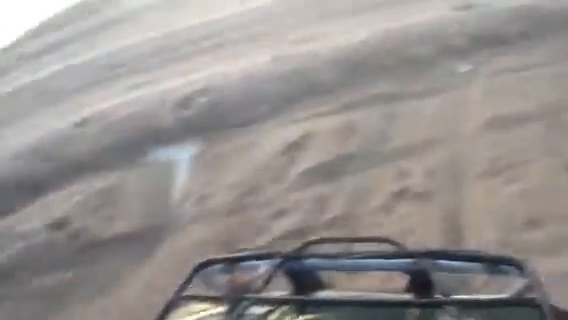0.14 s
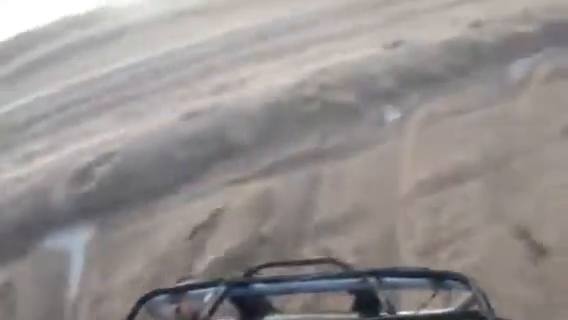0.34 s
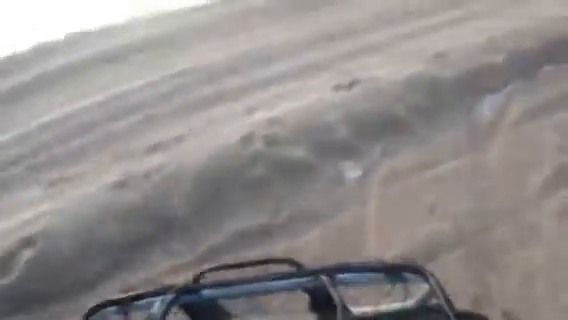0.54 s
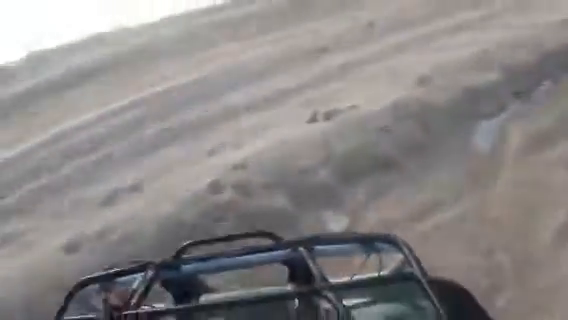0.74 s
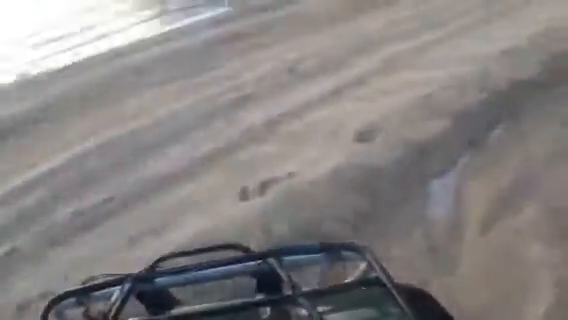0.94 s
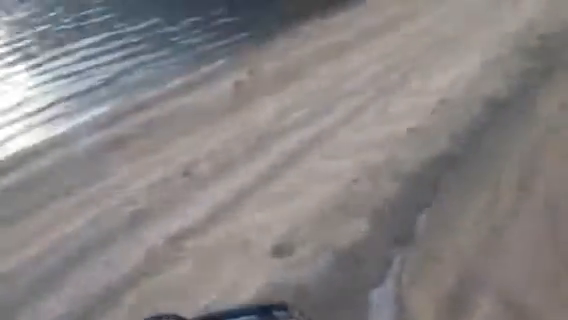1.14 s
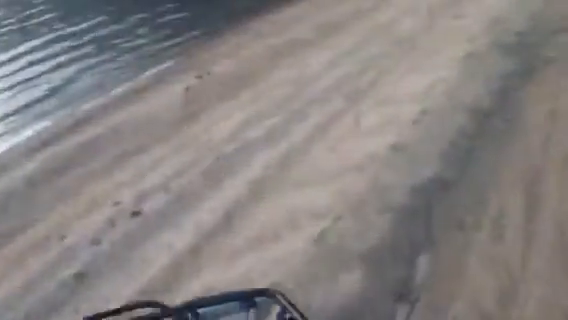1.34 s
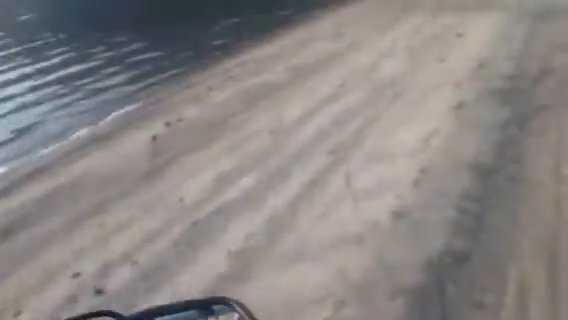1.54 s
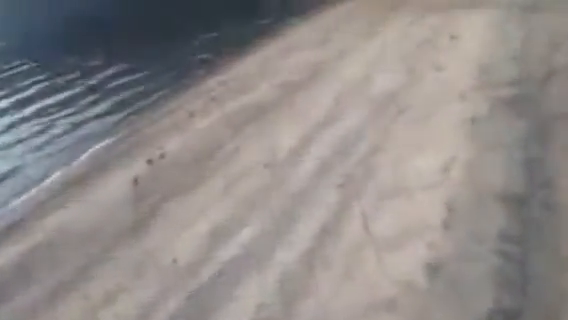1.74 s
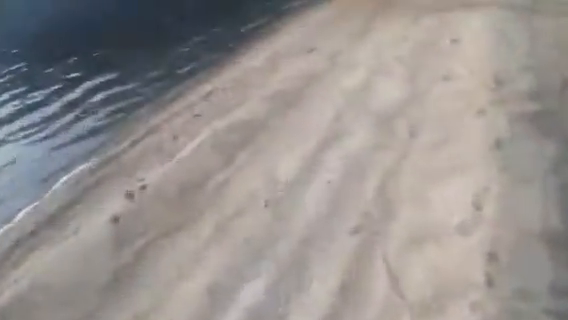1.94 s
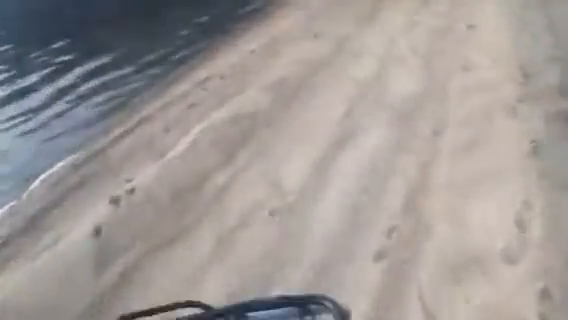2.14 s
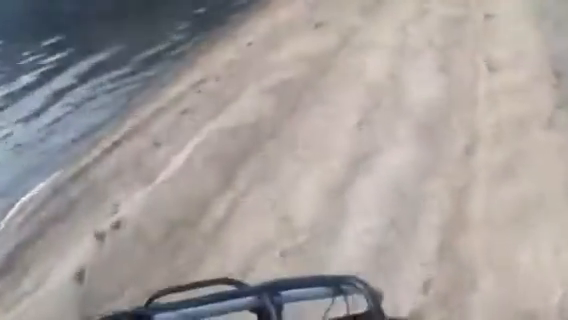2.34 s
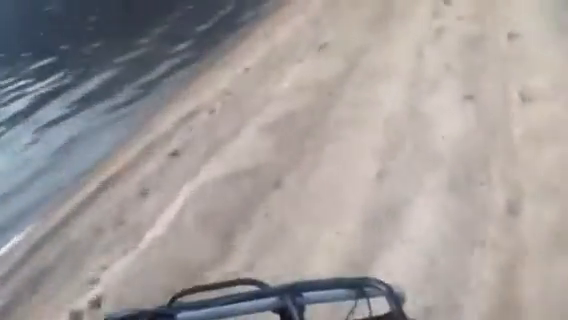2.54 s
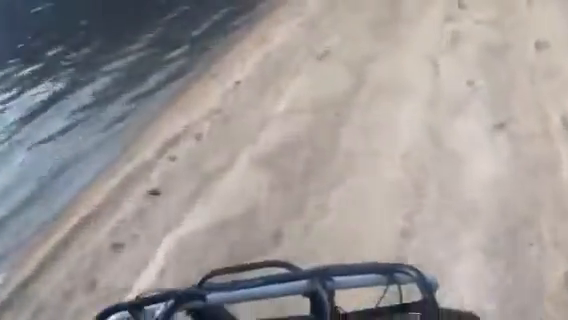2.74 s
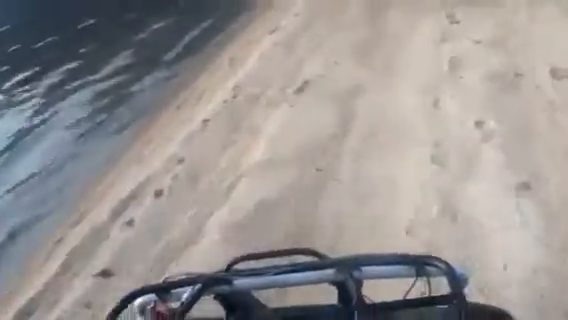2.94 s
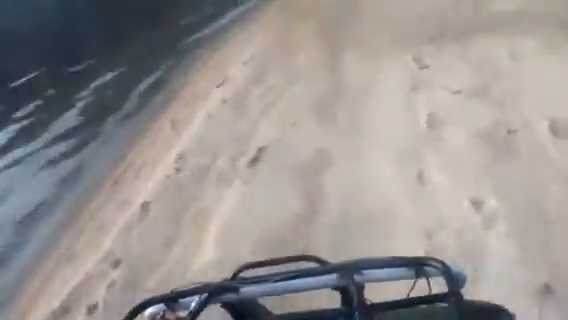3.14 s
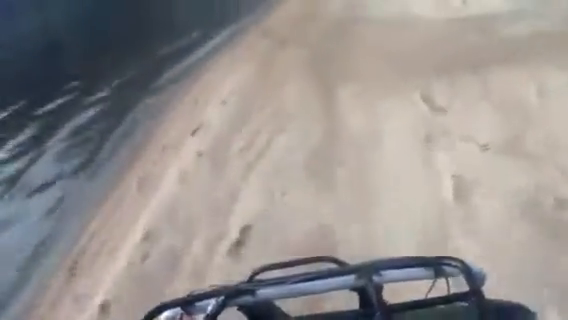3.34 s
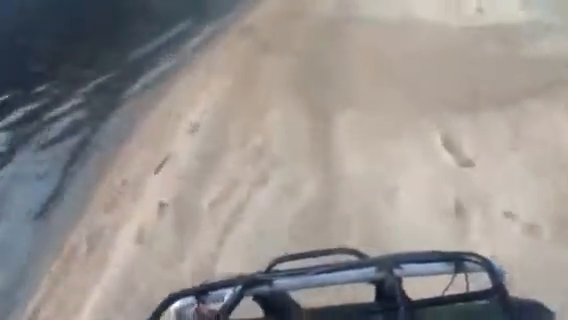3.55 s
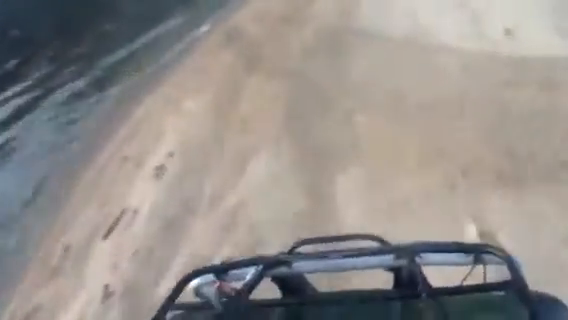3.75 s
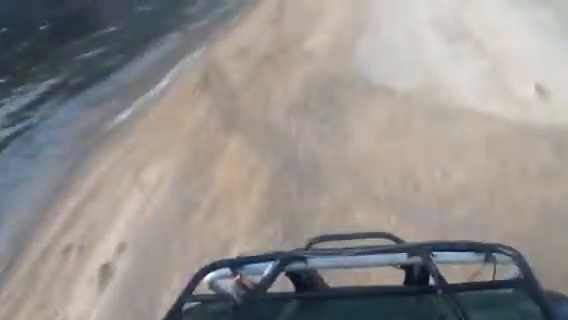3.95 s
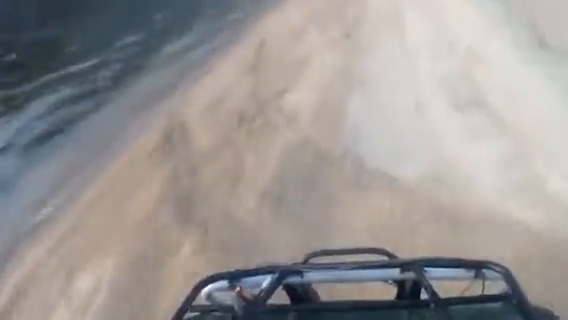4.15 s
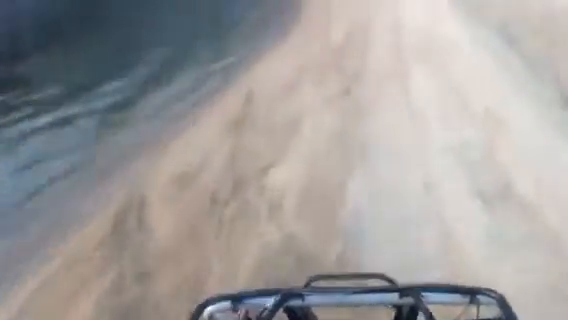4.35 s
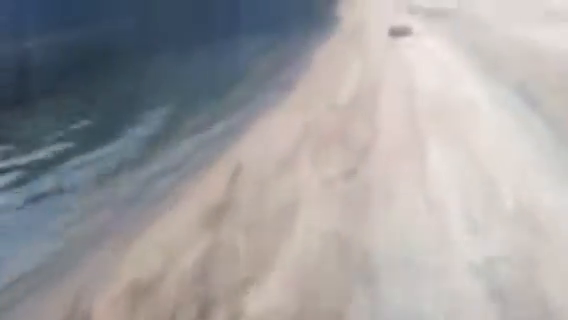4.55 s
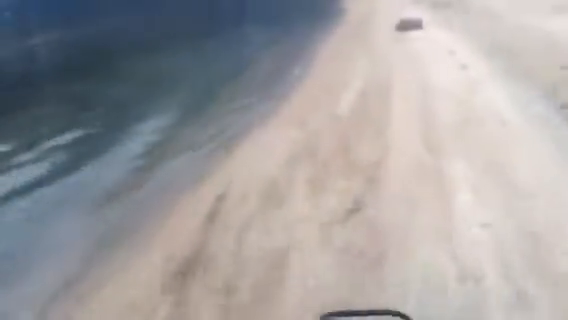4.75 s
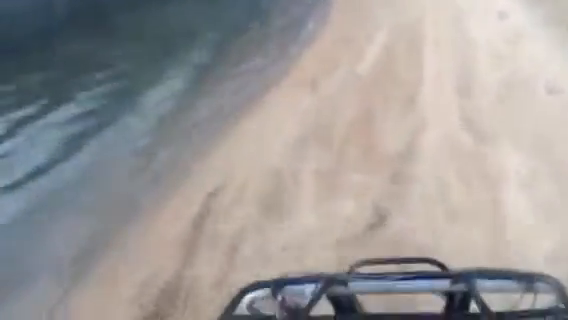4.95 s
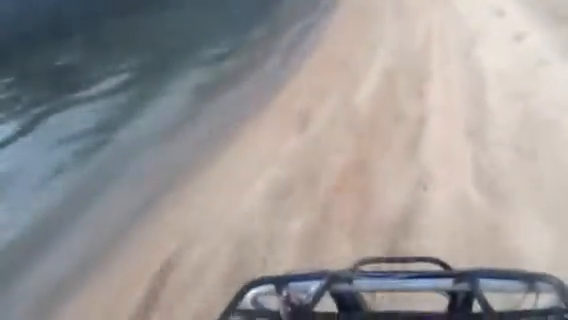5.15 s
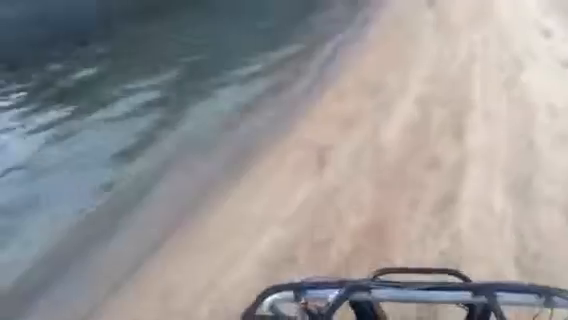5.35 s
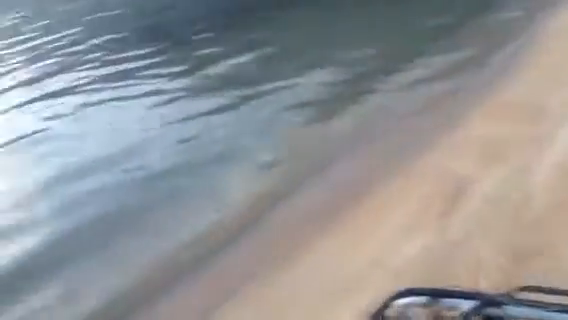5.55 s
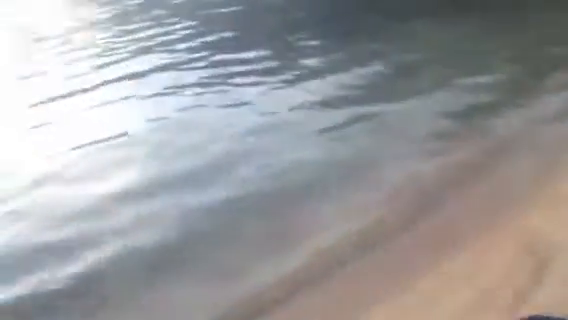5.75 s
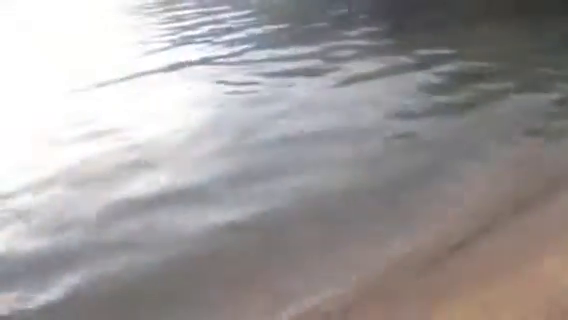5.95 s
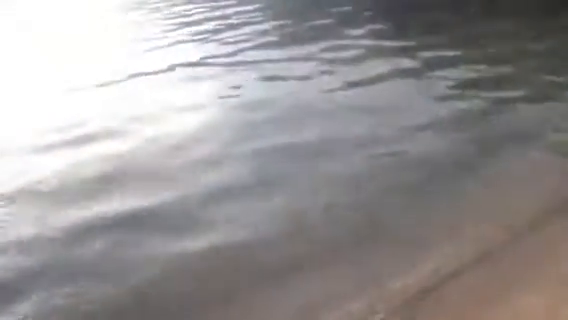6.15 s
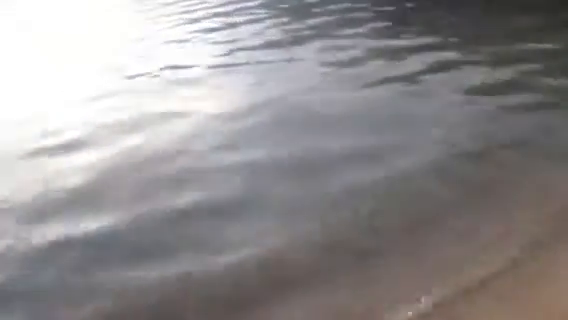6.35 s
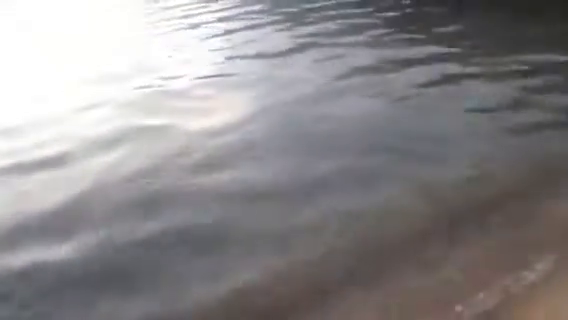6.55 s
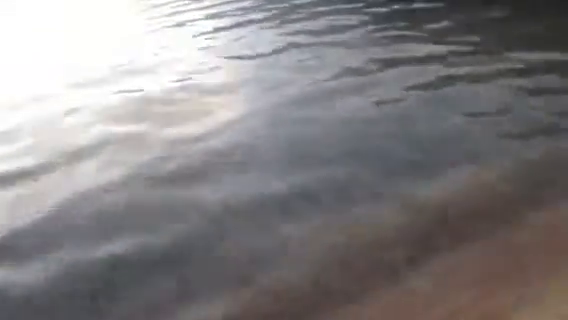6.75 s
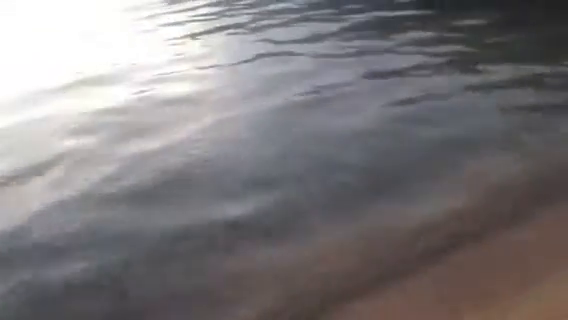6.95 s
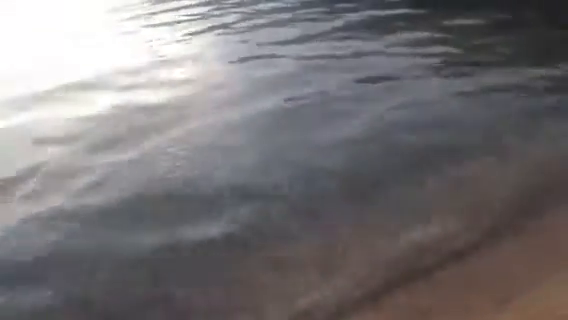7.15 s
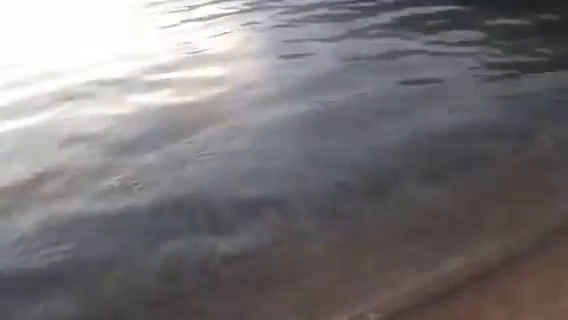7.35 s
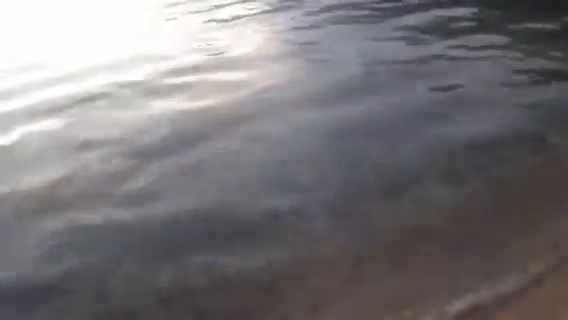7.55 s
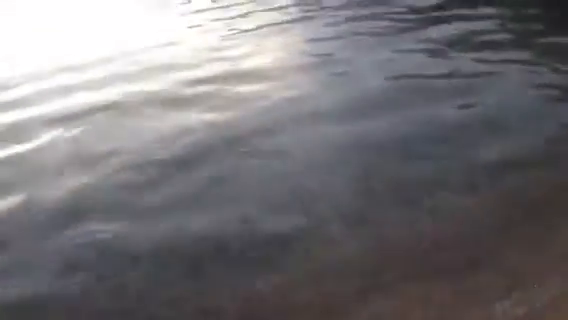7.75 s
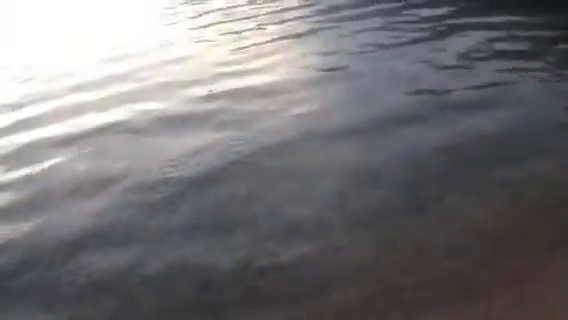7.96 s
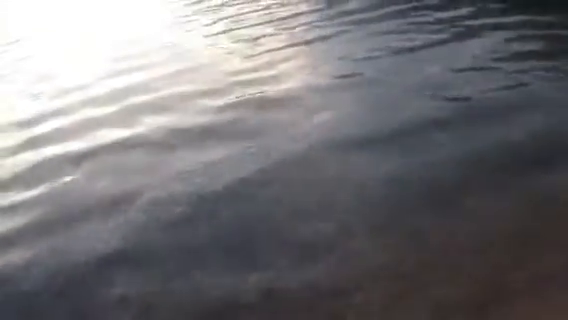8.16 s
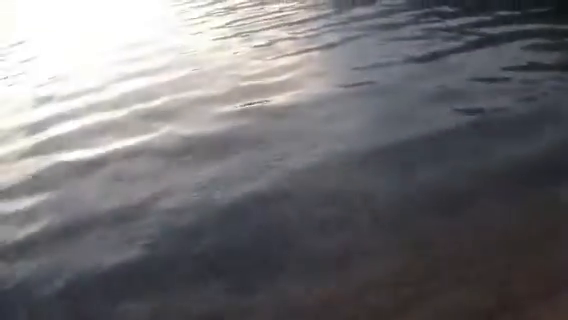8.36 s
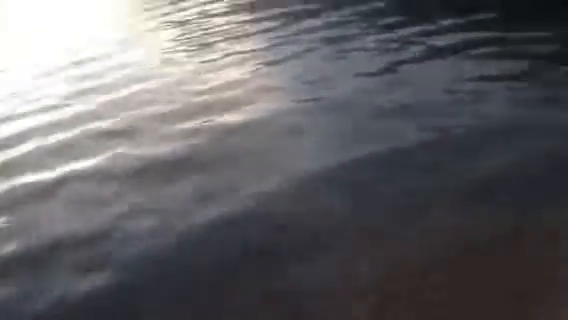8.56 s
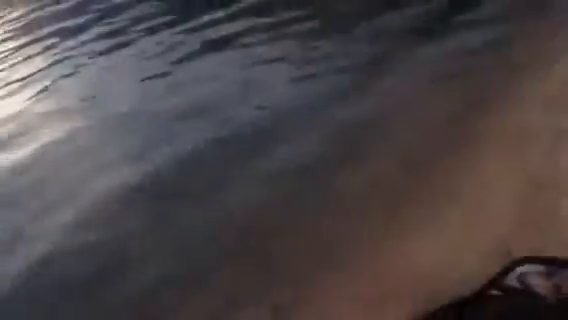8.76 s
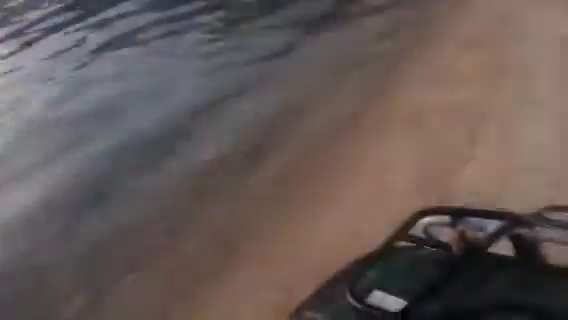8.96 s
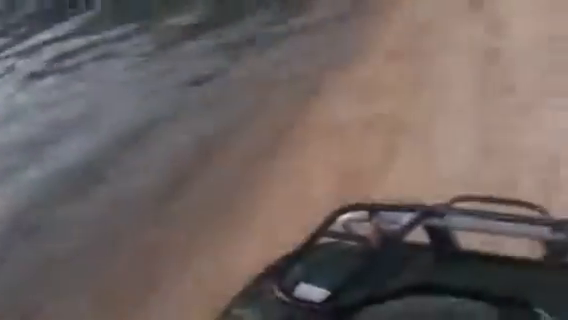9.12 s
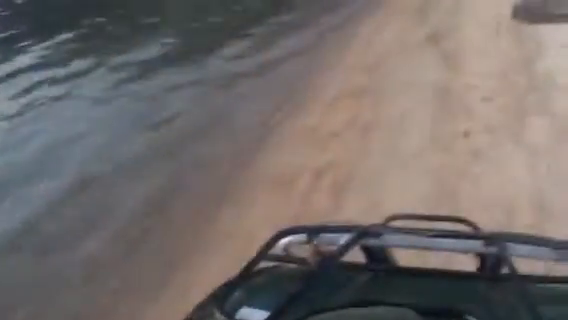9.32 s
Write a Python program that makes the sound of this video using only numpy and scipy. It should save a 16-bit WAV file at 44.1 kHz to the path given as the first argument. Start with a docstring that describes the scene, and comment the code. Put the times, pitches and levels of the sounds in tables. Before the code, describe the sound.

A quad bike's single-cylinder four-stroke engine pulls away with a booming exhaust and metallic clatter, heard close up from the seat. It climbs to a rasping drone with a faint whine and intake hiss. Two bumps knock the panels and the rack ticks lightly as the engine slows, missing a few firings. It settles into a quieter putting idle, then barks back up near the end.

```python
"""Quad bike on a sandy shore

Heard from the seat, a quad bike with a one-cylinder four-stroke engine pulls away, speeds up, coasts
down with a few missed firings, idles and pulls away again. Each firing rings the exhaust pipe and the
airbox (the air filter's box). Metal parts clatter, the intake hisses, whining tones come from the
transmission and engine, bumps knock the panels and the rack ticks. Most parts get louder with revs."""
import sys
import numpy as np
from scipy import signal
from scipy.fft import rfft, irfft, next_fast_len
from scipy.io import wavfile
from scipy.ndimage import uniform_filter1d

SR = 44100
rng = np.random.default_rng(int(sys.argv[2]) if len(sys.argv) > 2 else 0)


def transcribe(u):
    """Save the signal u as a 16-bit wav file named by the first command-line argument.

    u: samples, shape (n,) or (channels, n), limited to [-1, 1]; the rate is SR.
    q: integer samples, one column per channel.
    """
    v = np.clip(np.atleast_2d(u).T, -1, 1)
    q = np.round(v * 32767).astype(np.int16)
    wavfile.write(sys.argv[1], SR, q)


N = 418502
TIME = np.arange(N) / SR

# engine speed; a cycle runs from one firing to the next: (time [s], speed [firings/s])
SPEED = [(0.0, 17.62), (0.34, 17.46), (0.52, 23.77), (0.79, 25.26), (1.77, 23.64), (1.96, 27.62),
         (2.68, 37.32), (3.25, 35.05), (3.69, 35.37), (3.95, 33.47), (4.09, 30.34), (4.31, 30.01),
         (4.57, 22.16), (5.27, 16.57), (5.37, 18.15), (5.72, 15.08), (6.74, 13.43), (7.19, 13.6),
         (7.84, 13.12), (8.69, 13.45), (8.95, 23.76), (9.49, 23.89)]
# the rider's thumb on the throttle: (time [s], opening [0-1])
THROTTLE = [(.29, 0.02), (.345, 0.43), (.55, 0.5), (1.25, 0.24), (1.65, 0.4), (2.0, 0.45), (2.3, 0.6),
            (2.5, 0.55), (3.5, 0.52), (4.0, 0.59), (4.3, 0.43), (4.6, 0.45), (5.05, 0.09), (8.725, 0.01),
            (8.745, 0.84), (8.87, 0.95), (9.49, 1)]
# how hard the drive train rattles, dying away as the bike rolls out: (time [s], rattle [0-1])
RATTLE = [(0, 0.57), (.2, 0.49), (.9, 0.72), (2.05, 0.75), (2.45, 0.96), (3.5, 1), (4.5, 0.66), (5.5, 0.57),
          (6.8, 0.48), (8.0, 0.07), (8.8, 0.2), (9.49, 0.91)]
# three engine speeds: (idle [firings/s], cruising [firings/s], high revs [firings/s])
REV_STEPS = [15, 22, 35]
# where the beats blend into a drone: (start [firings/s], end [firings/s])
DRONE_SPEEDS = [26, 35]
# loudness rules: (base [dB], per doubling of speed [dB], per unit of throttle, of rattle, of snap [dB])
EXHAUST_RULE = (-38, 7, 15, -2.5, 1.5)
CASES_RULE = (-53.5, 6.5, 3.5, 15.5, 7)
VALVES_RULE = (-59, 9, 1.5, 11, 3.5)
HISS_RULE = (-78, 10.5, 7, 12, 2)
# extra swell at each firing when the throttle snaps open: (cases [gain], valves [gain], hiss [gain])
SNAP_SWELL = (0.97, 0.64, 0.85)

# exhaust pipe tones: (pitch [Hz], width [Hz], at idle [signed gain], under way [signed gain])
PIPE_TONES = [(100.7, 5.8, 0.003, 0.0079), (122, 33, 0.28, 0.0027), (151.5, 12.2, -0.365, 0.054),
              (265.3, 151.5, 1.14, 0.33), (258.2, 17, 0.17, 0.074), (284.3, 109.4, -1.358, -.4)]
# the rising piston pushes out a second puff at idle: (place [share of cycle], strength [gain])
SECOND_PUFF = (0.1454, 0.75)
# the gulp of air that follows each exhaust puff: (place [share of cycle], travel time [s])
GULP_DELAY = (0.2137, 0.0042)
# how hard the engine gulps: (speed [firings/s], strength [gain])
GULP_STRENGTH = [(15, 0.92), (24, 0.28), (30, 1.2), (36, 1.52)]
# airbox tones: (pitch [Hz], width [Hz], strength [signed gain])
AIRBOX_TONES = [(117, 13, -0.063), (167.2, 19, 0.079), (227, 28.3, -0.17)]
# firings that fail on a closed throttle: (time [s], level change [dB])
MISSED_FIRINGS = [(.07, -4.5), (.19, -7), (4.65, -2), (4.79, -4), (4.945, -9), (5.05, -4), (5.11, -0.5),
                  (5.22, -8), (5.28, -8), (5.34, -5.5), (5.39, -6)]
# valve and piston knocks: (place [share of cycle], length [share of cycle], strength [gain])
KNOCKS = [(0.101, 0.058, 0.082), (.29, 0.09, 0.31), (0.78, 0.16, 0.29)]
# taps of the valve lifters and piston: (place [share of cycle], strength [gain])
TAPS = [(0.03, 0.66), (.29, 0.93), (0.799, 0.91)]

# tone colour of each noise: (frequency [Hz], relative level [dB])
RUMBLE_COLOUR = [(25, -27.5), (58, -28.5), (95, -8.5), (140, 0), (210, 9.5), (290, -7), (380, -11.5),
                 (600, -37.5)]  # gas and tyres
CASES_COLOUR = [(330, -2), (385, -12.5), (460, -1), (510, -7.5), (565, -2.5), (680, -3), (740, -5.5),
                (820, -4), (900, -7.5), (990, -30), (1300, -32.5)]  # engine cases
VALVES_COLOUR = [(700, -35), (950, 2), (1100, -1.5), (1400, 1.5), (1600, 1), (1850, -0.5), (2050, -6),
                 (2300, -13), (2700, -27.5), (4000, -43.5)]  # valve gear
HISS_COLOUR = [(1800, -10), (2400, 3), (2900, 0), (3400, 0), (4300, -4), (4900, -2.5), (5250, -7.5),
               (5650, -7.5), (6300, -9.5), (7000, -19), (8000, -20.5), (9500, -38), (12000, -53.5)]  # air intake
CHAIN_COLOUR = [(1400, -14.5), (1700, 4.5), (1850, -3), (2000, -0.5), (2250, -21.5)]  # cam chain
SHAKE_COLOUR = [(25, -12.5), (45, 1), (70, -2)]  # frame
AIR_COLOUR = [(2000, 0), (6000, 6.5), (10000, -13), (13000, -5), (15200, -2)]  # faint high hiss
CRACK_COLOUR = [(1000, 13.5), (2000, 6.5), (2700, -9.5), (5800, -11), (8500, -26), (10500, -46)]  # bursts of gas

# ringing engine parts: (pitch [Hz], width [Hz], relative level [dB])
HEAD_TONES = [(780, 60, 4.5), (980, 150, 2.5), (1313, 81, -5.5), (1648, 76, -6), (1880, 110, -0.5)]  # cylinder head
FIN_TONES = [(1278, 150, 7), (1640, 110, -5), (3240, 550, -12), (4270, 800, -14.5), (4980, 260, -13.5),
             (5450, 410, -12)]  # thin metal
# the silencer shell's ring: (pitch [Hz], width [Hz])
SHELL_TONE = (486.5, 91)
# gliding tones, one list each: (time [s], pitch [Hz], relative level [dB])
INTAKE_WHISTLES = [
    [(.58, 3150, -61), (.9, 3500, -57), (1.25, 3390, -63), (1.85, 3200, -63)],
    [(3.9, 4090, -61), (4.1, 4060, -54), (4.3, 4020, -64), (4.55, 3600, -59)],
    [(2.0, 5600, -66), (2.7, 5680, -60), (3.6, 5620, -66), (4.27, 5690, -64), (4.48, 5850, -68)],
]
WHINING_TONES = [
    [(.8, 587, -38), (1.15, 579.6, -40), (1.7, 529, -44)],
    [(2.05, 461, -34.5), (2.25, 459, -34.5), (2.42, 507, -33.5), (2.57, 524, -30.5), (2.72, 502.4, -33.5),
     (2.85, 466.6, -33), (3.1, 425, -49.5), (3.4, 455, -42), (3.95, 435, -40)],
    [(2.3, 548, -46), (2.44, 589.6, -28), (2.62, 658.4, -29), (2.7, 698, -44), (2.85, 780, -41),
     (3.15, 771, -30.5), (3.35, 809, -39)],
    [(2.35, 670, -30), (2.75, 708.6, -40), (3.15, 675.6, -34), (3.55, 699, -37.5), (3.95, 665, -40)],
    [(4.65, 829, -44), (4.87, 870, -47), (5.05, 777, -36)],
]  # the fourth list is an engine overtone near 700 Hz at high revs
# one for each whistle: (width [Hz])
WHISTLE_WIDTHS = (95, 65, 80)
# the bike knocks over bumps: (time [s], peak level [dB])
BUMPS = [(3.985, -21), (4.288, -25.5)]
# body panel tones: (pitch [Hz], width [Hz])
PANEL_TONES = [(470, 41), (610, 70), (790, 49), (880, 80)]
# loose parts tick: (time [s], relative level [dB], strongest pitch [Hz], spread [octaves])
TICKS = [(4.385, -44, 3500, 0.4), (4.472, -50, 3670, 0.42), (4.555, -47, 3200, 0.5),
         (4.636, -41, 3760, 0.67), (5.337, -34, 2600, 2.5), (6.316, -58, 4200, 0.35),
         (6.556, -53, 5700, .3), (7.503, -47, 5470, 0.32), (7.612, -56, 4820, 0.41)]
# rack tones: (pitch [Hz], relative level [dB], ring time before extra damping [s])
RACK_TONES = [(1400, 10, .03), (1800, 9.5, .04), (2690, -3, .03), (3310, 3, .04), (4340, -4, .05),
              (5750, -8, 0.056), (8660, -6, .04)]


def from_db(db):
    """Turn decibels into a gain to multiply by."""
    return 10 ** (np.asarray(db) / 20)


def rms_one(x):
    """Scale a signal so that its average strength (rms) is 1."""
    return x / np.sqrt(np.mean(x ** 2) + 1e-20)


def in_time(rows):
    """Join a table's points with straight lines: one curve for each column after the time."""
    times, *columns = np.transpose(rows)
    return [np.interp(TIME, times, column) for column in columns]


def drift(rate_hz):
    """A smooth random wobble of size about 1, mostly slower than rate_hz."""
    step, warm_up = 40, 2000  # samples per point, points thrown away
    r = np.exp(-2 * np.pi * rate_hz * step / SR)
    slow = signal.lfilter([1], [1, -2 * r, r * r], rng.standard_normal(N // step + warm_up + 2))[warm_up:]
    return np.interp(np.arange(N) / step, np.arange(len(slow)), rms_one(slow))


def coloured(x, colour):
    """Give x a tone colour that falls away beyond the table's ends; rms 1."""
    size = next_fast_len(N)
    hz, db = np.transpose(colour)
    octave = np.log2(np.maximum(np.arange(size // 2 + 1) * SR / size, 1))
    outside = abs(octave - np.clip(octave, np.log2(hz[0]), np.log2(hz[-1])))
    gain = from_db(np.interp(octave, np.log2(hz), db) - 14.1 * outside)
    return rms_one(irfft(rfft(x, size) * gain, size)[:N])


def ring(x, hz, width_hz):
    """Let x ring at one pitch; a smaller width rings longer."""
    r = np.exp(-np.pi * width_hz / SR)
    feedback = [1, -2 * r * np.cos(2 * np.pi * hz / SR), r * r]
    return signal.lfilter(np.array([1, 0, -1]) * (1 - r * r) / 2, feedback, x + 1e-18)


def ring_twice(x, hz, width_hz, widen=1):
    """Two rings in a row give a purer tone; the second is `widen` times as wide."""
    return ring(ring(x, hz, width_hz), hz, widen * width_hz)


def keep_band(x, hz, side):
    """Gently keep the "low" or "high" side of a frequency."""
    return signal.sosfilt(signal.butter(2, hz, side, fs=SR, output="sos"), x)


def pulse(cycle, place, length):
    """A smooth hump once a cycle; place and length are shares of the cycle."""
    return np.exp(-.5 * (((cycle - place + .5) % 1 - .5) / length) ** 2)


def clicks(cycle, place, rough_db, jitter_s):
    """One click a cycle, each a little different in strength and timing."""
    at = np.flatnonzero(np.diff(np.floor(cycle - place)) > 0)
    size, slip = rng.standard_normal((len(at), 2)).T
    out = np.zeros(N)
    out[np.clip(at + (slip * jitter_s * SR).astype(int), 0, N - 1)] = from_db(rough_db * size)
    return out


def knock_pattern(cycle):
    """Humps where the valves and piston strike."""
    return sum(strength * pulse(cycle, place, length) for place, length, strength in KNOCKS)


def swell(cycle, depth, place, length):
    """A gain that rises at each firing but keeps the average level."""
    gain = 1 + depth * pulse(cycle, place, length)
    return gain / np.sqrt(uniform_filter1d(gain ** 2, size=6600))


def glide(rows, waver_hz, waver_rate_hz, flutter_db, flutter_rate_hz, fade_s):
    """A gliding tone that wobbles in pitch and level and fades in and out."""
    hz, db = in_time(rows)
    fade = np.clip(np.minimum(TIME - rows[0][0], rows[-1][0] - TIME) / fade_s, 0, 1)
    turns = np.cumsum(hz + waver_hz * drift(waver_rate_hz)) / SR
    gain = fade * from_db(db + flutter_db * drift(flutter_rate_hz))
    return gain * np.sqrt(2) * np.sin(2 * np.pi * turns)


def throttle_snap(throttle, catch_up_s):
    """How far the throttle is ahead of the engine (0-1): jumps as it opens, then relaxes."""
    r = np.exp(-1 / (catch_up_s * SR))
    return np.clip(throttle - signal.lfilter([1 - r], [1, -r], throttle), 0, 1)


def loudness(rule, speed, throttle, rattle, snap):
    """A part's level in dB, set by speed, throttle, rattle and snap."""
    base_db, doubling_db, throttle_db, rattle_db, snap_db = rule
    doublings = np.log2(speed / 13)  # idle is 13 firings/s
    return base_db + doubling_db * doublings + throttle_db * throttle + rattle_db * rattle + snap_db * snap


def exhaust(cycle, speed, throttle):
    """Puffs of gas ring the pipe, with a double putt at idle; gulps of air ring the airbox."""
    under_way = np.maximum(np.interp(speed, [14.6, 18], [0, 1]), np.clip(2 * throttle - .3, 0, .6))
    valve_cycle = cycle + .037  # the exhaust valve opens a little early
    push_place, push_gain = SECOND_PUFF
    gulp_place, travel_s = GULP_DELAY
    puffs = clicks(valve_cycle, 0, rough_db=.9, jitter_s=.00008)
    puffs += (1 - under_way) * push_gain * clicks(valve_cycle, push_place, rough_db=1.3, jitter_s=.0002)
    gulps = clicks(valve_cycle - travel_s * speed, gulp_place, rough_db=1, jitter_s=.0001)
    gulps = keep_band(gulps * np.interp(speed, *np.transpose(GULP_STRENGTH)), 85, "high")
    pipe = sum(ring(puffs * (idle + under_way * (moving - idle)), hz, width)
               for hz, width, idle, moving in PIPE_TONES)
    boom = pipe + sum(gain * ring(gulps, hz, width) for hz, width, gain in AIRBOX_TONES)
    for _ in range(2):
        boom = keep_band(keep_band(boom, 70, "high"), 343, "low")
    # hold the rms at 1 over every four cycles
    energy = np.cumsum(boom ** 2)
    before, after = [np.interp(cycle + step, cycle, np.arange(N)).astype(int) for step in (-2, 2)]
    return boom / np.sqrt((energy[after] - energy[before]) / (after - before))


def misfires(cycle):
    """Each failed firing makes a dip, in dB, one cycle long."""
    firing = np.floor(cycle + .12)
    dips_db = sum(db * (firing == firing[int(s * SR)]) for s, db in MISSED_FIRINGS)
    return uniform_filter1d(dips_db, size=500)


def rumble(cycle):
    """Swirling gas and rolling tyres make a low noise that swells at each firing."""
    return coloured(rng.standard_normal(N) * (1 + .34 * pulse(cycle, place=0, length=.23)), RUMBLE_COLOUR)


def clatter(cycle, colour, knock, grain_db, regular):
    """Many tiny metal hits, strongest at the knocks; the share `regular` repeats every cycle."""
    slots = 600
    pattern = rng.standard_normal(slots)
    slot = (cycle % 1 * slots).astype(int) % slots
    new_slot = np.diff(slot, prepend=0) != 0
    repeating = pattern[slot] * new_slot / np.sqrt(np.gradient(cycle) * slots)
    hits = np.sqrt(regular) * repeating + np.sqrt(1 - regular) * rng.standard_normal(N)
    return coloured(hits * (1 + knock * knock_pattern(cycle)) * from_db(grain_db * drift(83)), colour)


def intake_hiss(grain_db):
    """Air hisses unevenly into the airbox."""
    return coloured(rng.standard_normal(N) * from_db(grain_db * drift(58)), HISS_COLOUR)


def head_taps(cycle):
    """The valve lifters and piston tap in every cycle and ring the cylinder head."""
    out = np.zeros(N)
    for hz, width, db in HEAD_TONES:
        taps = sum(strength * clicks(cycle, place, rough_db=3, jitter_s=.001) for place, strength in TAPS)
        out += from_db(db) * ring_twice(taps, hz, width, widen=4) / width
    return rms_one(out)


def shell_ring(speed):
    """The silencer's shell rings, most clearly at low speed."""
    tone = rms_one(ring_twice(rng.standard_normal(N), *SHELL_TONE))
    return from_db(-2.5 - 2.9 * np.log2(speed / 13)) * tone


def frame_shake():
    """The frame shakes with a deep, steady noise."""
    return coloured(rng.standard_normal(N), SHAKE_COLOUR)


def fin_ring(cycle, grain_db):
    """The valve knocks keep thin metal parts ringing."""
    knocks = .5 + knock_pattern(cycle)
    out = np.zeros(N)
    for hz, width, db in FIN_TONES:
        shaking = rng.standard_normal(N) * knocks * from_db(grain_db * drift(40))
        out += from_db(db) * ring_twice(shaking, hz, width)
    return rms_one(out)


def air_hiss():
    """A steady high hiss lies behind everything."""
    return coloured(rng.standard_normal(N), AIR_COLOUR)


def gas_crack(cycle, throttle, snap):
    """A short, bright burst of gas on each firing at wide throttle, harder just after a snap."""
    strength = np.clip(throttle, 1e-3, 1.2) ** 7.9 + .9 * snap ** 3
    return strength * pulse(cycle, place=.09, length=.07) * coloured(rng.standard_normal(N), CRACK_COLOUR)


def intake_whistles():
    """Air whistles thinly in the intake: gliding tones broken up by slow noise."""
    out = np.zeros(N)
    for rows, width in zip(INTAKE_WHISTLES, WHISTLE_WIDTHS):
        tone = glide(rows, waver_hz=width, waver_rate_hz=150, flutter_db=3, flutter_rate_hz=11, fade_s=.09)
        out += tone * rms_one(keep_band(rng.standard_normal(N), width, "low"))
    return out


def whines(cycle):
    """Whining tones from the transmission and engine; the jolt of each firing roughens them."""
    tones = sum(glide(rows, waver_hz=6, waver_rate_hz=79, flutter_db=2.2, flutter_rate_hz=20, fade_s=.1)
                for rows in WHINING_TONES)
    return (1 + .35 * np.cos(2 * np.pi * cycle)) * tones


def gear_tone(cycle, teeth, slack, jolt):
    """Gear teeth meet `teeth` times a cycle; they wander in their slack and each firing jolts them."""
    tone = np.sin(2 * np.pi * (teeth * cycle + slack * drift(27)))
    return rms_one((1 + jolt * pulse(cycle, place=.1, length=.09)) * tone)


def panel_bumps(contact_s):
    """Each bump briefly knocks the body panels."""
    out, age = np.zeros(N), np.arange(SR // 8) / SR
    for s, db in BUMPS:
        contact = rng.standard_normal(len(age)) * np.exp(-age / contact_s)
        knock = sum(ring_twice(contact, hz, width, widen=3) for hz, width in PANEL_TONES)
        at = int(s * SR)
        out[at:at + len(age)] += from_db(db) * knock / abs(knock).max()
    return out


def rack_ticks(scuff_s):
    """Loose parts scuff the rack; each scuff mostly rings the tones near its own pitch."""
    out, age = np.zeros(N), np.arange(SR // 8) / SR
    for s, db, centre_hz, spread in TICKS:
        scuff = rng.standard_normal(len(age)) * np.exp(-age / scuff_s)
        tick = np.zeros(len(age))
        for hz, tone_db, ring_s in RACK_TONES:
            nearness = np.exp(-.5 * (np.log2(hz / centre_hz) / spread) ** 2)
            width = np.log(1000) / np.pi / ring_s + 200  # 200 Hz of extra damping
            tick += from_db(tone_db) * nearness * ring(ring(scuff, hz, width), hz, hz / 2)
        at = int(s * SR)
        out[at:at + len(age)] += from_db(db) * tick / abs(tick).max()
    return keep_band(out, 8800, "low")


def scene():
    """Add up all the sounds; the engine's parts share one cycle count."""
    speed, = in_time(SPEED)
    throttle, = in_time(THROTTLE)
    rattle, = in_time(RATTLE)
    cycle = np.cumsum(speed) / SR - .05
    snap = throttle_snap(throttle, catch_up_s=.61)
    drone = np.interp(speed, DRONE_SPEEDS, [0, 1])

    def by_revs(idle, cruising, high):
        """Slide between three values as the engine speed changes."""
        return np.interp(speed, REV_STEPS, [idle, cruising, high])

    charge = np.minimum(throttle, .55)  # holding the throttle wider makes the boom no louder
    exhaust_db = loudness(EXHAUST_RULE, speed, charge, rattle, snap) + misfires(cycle)
    cases_db, valves_db, hiss_db = [loudness(rule, speed, throttle, rattle, snap)
                                    for rule in (CASES_RULE, VALVES_RULE, HISS_RULE)]
    mix = from_db(exhaust_db + by_revs(-.2, .2, 1)) * exhaust(cycle, speed, throttle)
    mix += from_db(exhaust_db + by_revs(-17, -17, -14)) * rumble(cycle)
    # cases, valves and hiss swell on every firing; a throttle snap makes them bark
    cases_bark, valves_bark, hiss_bark = [depth * snap for depth in SNAP_SWELL]
    cases = clatter(cycle, CASES_COLOUR, knock=.25, grain_db=.5, regular=by_revs(.3, .5, .46))
    cases *= swell(cycle, by_revs(.6, .35, .3) + cases_bark, place=.27, length=.17)
    valves = clatter(cycle, VALVES_COLOUR, knock=1, grain_db=1.07, regular=.35)
    valves *= swell(cycle, by_revs(.3, .3, .45) + valves_bark, place=.015, length=.11)
    hiss = intake_hiss(grain_db=1)
    hiss *= swell(cycle, by_revs(.3, .45, .8) + hiss_bark, place=.074, length=.31)
    mix += from_db(cases_db) * cases + from_db(valves_db) * valves + from_db(hiss_db) * hiss
    mix += from_db(-34.5) * gas_crack(cycle, throttle, snap)
    mix += from_db(by_revs(-57, -49, -46)) * head_taps(cycle)
    # in the drone the cam chain rasps more and the shell's ring is lost
    chain = clatter(cycle, CHAIN_COLOUR, knock=3.1, grain_db=4, regular=.21)
    mix += from_db(-41.5) * (.082 + 1.1 * drone) * rattle * chain
    mix += from_db(cases_db) * (1 - drone) * shell_ring(speed)
    mix += from_db(-71.5) * frame_shake()
    mix += from_db(by_revs(-60, -57, -52)) * fin_ring(cycle, grain_db=2.5)
    mix += from_db(-1) * whines(cycle)
    mix += from_db(-1.5) * intake_whistles()
    mix += from_db(.5) * rack_ticks(scuff_s=.01)
    mix += from_db(-44) * drone * gear_tone(cycle, teeth=52, slack=.18, jolt=.87)
    mix += panel_bumps(contact_s=.0047)
    mix += from_db(-71) * air_hiss()
    return mix[None]


def record(dry):
    """The highest treble, above 15300 Hz, is cut steeply."""
    return signal.sosfilt(signal.ellip(12, .1, 80, 15300, fs=SR, output="sos"), dry)


dry = scene()
out = record(dry)
transcribe(out)
```